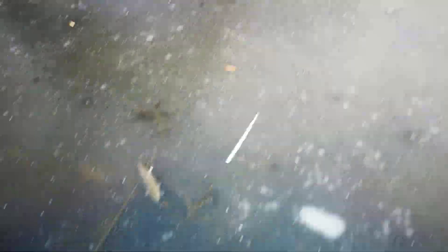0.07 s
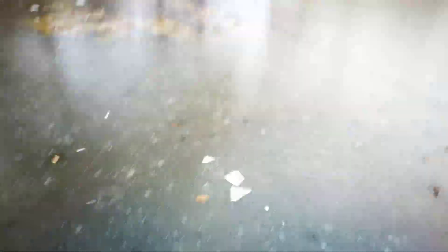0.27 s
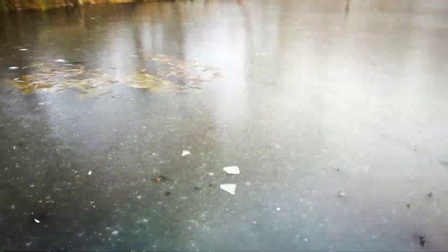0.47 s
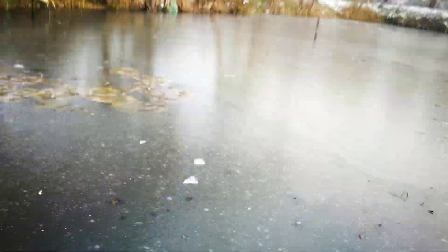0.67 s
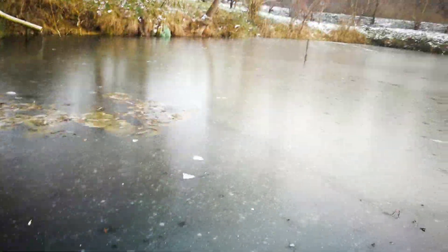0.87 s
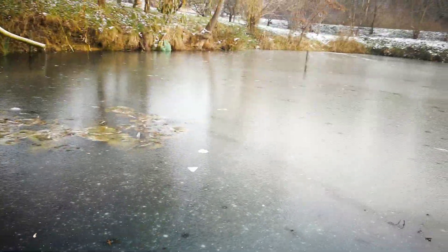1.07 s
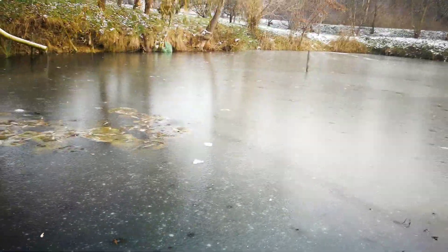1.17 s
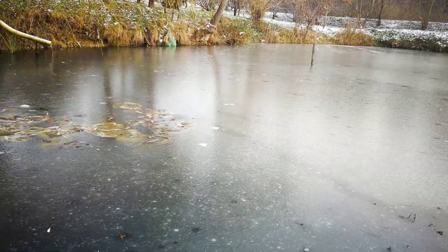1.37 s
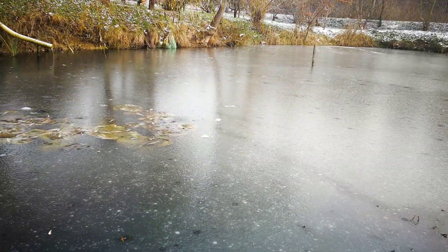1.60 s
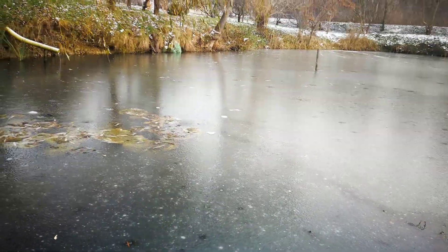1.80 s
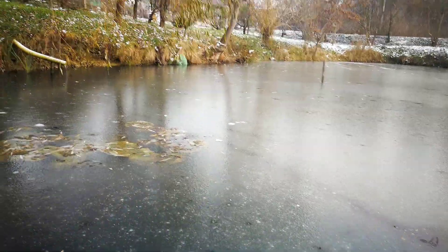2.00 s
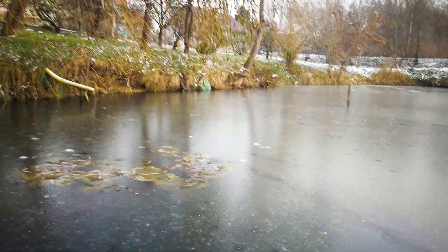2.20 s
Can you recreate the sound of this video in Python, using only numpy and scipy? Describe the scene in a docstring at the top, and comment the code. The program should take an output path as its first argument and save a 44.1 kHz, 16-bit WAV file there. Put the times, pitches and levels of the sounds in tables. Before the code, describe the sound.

Thin ice shatters on a frozen pond after a soft sleeve swish close to the microphone. Its pieces bounce with faint chirps, then rattle and hiss into the distance under low gusts of wind.

```python
"""A frozen pond: a thin plate of ice is tossed onto it, breaks, bounces and skitters away in shards.
Each blow slaps the ice sheet, rings the shard and sends a short falling chirp through the sheet.
The sliding shards scrape and rattle over tiny bumps, fading with distance; one bump gives a soft knock.
Wind buffets the microphone throughout."""
import sys
import numpy as np
from scipy import signal
from scipy.fft import rfft, irfft
from scipy.io import wavfile
from scipy.ndimage import map_coordinates

SR = 44100
rng = np.random.default_rng(int(sys.argv[2]) if len(sys.argv) > 2 else 0)


def to_wav(s):
    """Save 16-bit WAV."""
    ch = np.atleast_2d(s).T  # columns
    pcm = np.round(np.clip(ch, -1, 1) * 32767)  # PCM
    wavfile.write(sys.argv[1], SR, pcm.astype(np.int16))


N = 99225
T = np.arange(N) / SR

# Sliding friction: (time [s], low scrape [dB], treble hiss [dB])
SLIDE_LEVELS = [(.27, -55, -57), (.32, -43.5, -48), (.345, -45.5, -53), (.39, -48.5, -42), (.55, -42, -43),
                (.62, -40.5, -46.5), (.77, -40, -45), (.85, -43, -49.5), (1.035, -44.5, -51.5),
                (1.058, -52.5, -64), (1.11, -48.5, -52), (1.19, -48, -64.5), (1.26, -51.5, -49),
                (1.355, -53, -72), (1.45, -51, -55.5), (1.585, -54, -59), (2.25, -56, -62.5)]
# Main resonance of the shards: (time [s], pitch [Hz], level [dB])
SHARD_RESONANCE = [(.3, 3600, -78.5), (.37, 3680, -40), (.44, 3700, -51.5), (.77, 3700, -45),
                   (1.03, 4038, -47.5), (1.23, 3850, -48), (2.25, 3800, -54)]
# Treble of small ice contacts: (frequency [Hz], gain [dB])
HISS_SPECTRUM = [(2000, -9.5), (5000, -9.5), (6200, -2), (9100, 1), (10200, -4.5), (11300, -0.5),
                 (13000, -10), (15000, -8.5)]

SLAP_RISE_S, RING_RISE_S, PING_RISE_S = 0.00036, 0.0011, 0.00076
RING_PAN_DB, LOW_PAN_DB, HIGH_PAN_DB = 2.5, 5, 9
ROCKING_HZ, FORCE_SCATTER_DB = 134.96, 4.5


def undb(db):
    return 10 ** (np.asarray(db) / 20)


def unit_rms(x):
    return x / np.sqrt(np.mean(x ** 2))


def curve(table, column, t):
    """Table column interpolated at times t."""
    return np.interp(t, np.array(table)[:, 0], np.array(table)[:, column])


def colour(x, spectrum):
    """Minimum-phase filter through (Hz, dB) points, scaled to unit power gain."""
    size = 2 ** 17
    hz, db = np.array(spectrum).T
    bins_hz = np.arange(size // 2 + 1) * SR / size + 1
    gain = unit_rms(undb(np.interp(np.log(bins_hz), np.log(hz), db)))
    cepstrum = irfft(np.log(gain))
    cepstrum[1:size // 2] *= 2
    cepstrum[size // 2 + 1:] = 0
    return irfft(rfft(x, size) * np.exp(rfft(cepstrum)), size)[..., :N]


def wander(rate_hz):
    """Random drift, rms 1; holds after 2000 steps."""
    return unit_rms(np.interp(T * rate_hz, np.arange(2000), rng.standard_normal(2000)))


def burst(rise_s, hz=None):
    """Heavily damped ring; a noise crunch if no pitch is given."""
    t = T[:700]
    shape = (t / rise_s * np.exp(1 - t / rise_s)) ** 2
    if hz is not None:
        return shape * np.sin(2 * np.pi * hz * t)
    crunch = shape * rng.standard_normal(len(t))
    return crunch * np.linalg.norm(shape) / np.linalg.norm(crunch)


def add(track, at_s, sound):
    i = int(at_s * SR)
    track[..., i:i + sound.shape[-1]] += sound[..., :max(N - i, 0)]


def pan(left_lead_db):
    gains = undb(np.array([[left_lead_db], [-left_lead_db]]) / 2)
    return gains / gains.mean()


def stereo(make, width):
    """Two ears of a random sound; width is the unshared power fraction."""
    return np.sqrt(1 - width) * make() + np.sqrt(width) * np.array([make(), make()])


def wind():
    """Puffs rumble on the microphone, brighter when strong, over still air; one low thump."""
    # Wind puffs: (time [s], half width [s], level [dB])
    puffs = [(0.076, 0.021, -44.5), (0.26, 0.043, -42), (0.727, 0.029, -47.5), (1.18, 0.055, -44),
             (1.309, 0.034, -36.5), (1.364, 0.0092, -37), (1.54, 0.031, -47), (1.695, 0.033, -37),
             (1.792, 0.015, -38), (1.955, 0.08, -38), (2.12, 0.0089, -39.5), (2.25, 0.027, -35)]
    # Wind and air spectra: (frequency [Hz], gain [dB])
    rumble_spectrum = [(20, -5), (45, 3), (80, 2), (140, -2.5), (200, -12), (300, -18.5), (450, -34),
                       (900, -66.5)]
    air_spectrum = [(30, 1), (150, 12), (400, 8.5), (1000, -1), (2500, -13), (4500, -5.5), (8500, -10),
                    (11000, -5.5), (15000, -25)]
    buffet_spectrum = [(50, -23), (130, 4.5), (260, -6), (380, -17.5), (600, -35.5), (2000, -58)]
    breeze = undb(-57 + 9.5 * np.clip((T - 1.068) / 0.05, 0, 1))
    puff_power = sum(undb(db) ** 2 * np.exp(-((T - at_s) / half_s) ** 2) for at_s, half_s, db in puffs)
    gust = np.sqrt(breeze ** 2 + puff_power)
    mid, side, flutter, flutter_side = rng.standard_normal((4, N))
    ears = np.array([[1], [-1]])
    rumble = colour(mid + undb(-13.5) * ears * side, rumble_spectrum) * gust
    buffet = colour(flutter + 0.94 * ears * flutter_side, buffet_spectrum) * gust ** 2 / gust.max()
    air = colour(stereo(lambda: rng.standard_normal(N), 0.9), air_spectrum)
    thump_s, thump_hz = 0.178, 59.6
    cycles = (T - thump_s) * thump_hz
    thump = -np.exp(-2 * cycles ** 2) * np.sin(2 * np.pi * cycles)
    return undb(-0.5) * rumble + undb(-1.5) * buffet + undb(-62.5) * air + undb(-31) * thump


def toss():
    """Sleeve swish and a soft flick as the plate is let go."""
    # Sleeve: (frequency [Hz], gain [dB])
    spectrum = [(200, -17.5), (700, 5), (2300, 1.5), (4500, -6.5), (10500, -4), (15000, -13)]
    swish = rng.standard_normal((2, N)) * np.exp(-0.5 * ((T - 0.048) / 0.026) ** 2)
    out = undb(-43.5) * colour(swish, spectrum)
    add(out, 0.0452, undb(-31.5) * burst(rise_s=0.00085, hz=790))
    return out


def landing():
    """The plate hits, breaks and bounces; splinters fly off after each blow."""
    # Impacts: (time [s], slap [dB], slap [Hz], ring [dB], ring [Hz], ping [dB], ping [Hz], crack [dB])
    blows = [(0.2123, -3.5, 1590, -13, 3330, -16.5, 7800, -11),
             (0.22, -4, 1240, -23, 2760, -14.5, 7730, -11.5),
             (0.2621, -10.5, 2050, -25, 3320, -18.5, 8220, -21.5),
             (0.2842, -31, 2130, -20.5, 3670, -5.5, 6924, -9),
             (0.3075, -24, 1940, -25, 3530, -17.5, 7970, -15),
             (0.354, -49, 2060, -24, 3680, -12.5, 9160, -16.5),
             (0.3629, -26, 1840, -14.5, 3400, -14, 8780, -11)]
    # Breaking ice: (frequency [Hz], gain [dB])
    crack_spectrum = [(400, -26), (1200, -12.5), (3000, -6), (4700, -6), (5800, -0.5), (9000, 1.5),
                      (11000, -1), (12500, -5.5), (15500, -8)]
    tones, cracks = np.zeros((2, 2, N))
    for at_s, slap_db, slap_hz, ring_db, ring_hz, ping_db, ping_hz, crack_db in blows:
        slap = undb(slap_db) * burst(SLAP_RISE_S, slap_hz)
        ring = undb(ring_db) * burst(RING_RISE_S, ring_hz)
        ping = undb(ping_db) * burst(PING_RISE_S, ping_hz)
        crack = undb(crack_db) * stereo(lambda: burst(rise_s=0.00056), 0.48)
        add(tones, at_s, pan(LOW_PAN_DB) * (slap + ring) + pan(HIGH_PAN_DB) * ping)
        add(cracks, at_s, pan(HIGH_PAN_DB) * crack)
        for delay_s in rng.exponential(0.0076, size=6):
            splinter = undb(crack_db - 17) * stereo(lambda: burst(rise_s=0.00028), 0.36)
            add(cracks, at_s + delay_s, pan(LOW_PAN_DB) * splinter)
    return tones + colour(cracks, crack_spectrum)


def sheet_chirp(x):
    """Bending waves in the pond ice: lows travel slower, so a blow becomes a falling chirp."""
    centre_hz, width_oct = 1007.3, 0.74
    ice_travel_s, air_travel_s = 0.017, 0.008  # at centre_hz
    lag_s_per_s = 0.002045  # later arrival as the shards slide away
    hz = np.arange(N + 1) * SR / (2 * N) + 1
    phase = 2 * np.pi * (2 * ice_travel_s * np.sqrt(hz * centre_hz) - air_travel_s * hz)
    gain = undb(-12.5) * np.exp(-0.5 * (np.log2(hz / centre_hz) / width_oct) ** 2)
    waves = irfft(rfft(x, 2 * N) * gain * np.exp(-1j * phase))[..., :N]
    return np.array([map_coordinates(ear, [np.arange(N) * (1 - lag_s_per_s)]) for ear in waves])


def reverb(x, t60_s):
    """Diffuse decay, different in each ear."""
    t = T[:SR // 2]
    response = rng.standard_normal((2, len(t))) * np.exp(-np.log(1000) * t / t60_s)
    return signal.fftconvolve(x, response / np.linalg.norm(response[0]), axes=1)[:, :N]


def scrape():
    """Dense tiny contacts with the frosted surface, pulsing as the shards rock."""
    # Low friction noise: (frequency [Hz], gain [dB])
    scrape_spectrum = [(250, -13), (520, -9.5), (800, -4.5), (1200, 1.5), (1700, 0), (2700, -2),
                       (4300, -2.5), (6000, -6), (12000, -14.5)]
    grains_per_s, scatter_db = 3500, 6.5

    def grains():
        contacts = (rng.random(N) < grains_per_s / SR) * np.sign(rng.standard_normal(N))
        return unit_rms(contacts * undb(scatter_db * np.minimum(rng.standard_normal(N), 2)))

    rocking = unit_rms(undb(3.5 * wander(ROCKING_HZ)))
    low = stereo(grains, 0.7) * rocking * undb(curve(SLIDE_LEVELS, 1, T) + 2.5)
    hiss = stereo(grains, 1) * rocking * undb(curve(SLIDE_LEVELS, 2, T))
    return pan(LOW_PAN_DB) * colour(low, scrape_spectrum) + pan(HIGH_PAN_DB) * colour(hiss, HISS_SPECTRUM)


def rubbed_ring():
    """Rubbing keeps the shards' main resonance ringing, rough and unsteady in pitch."""
    width_hz = 550
    pitch_hz = curve(SHARD_RESONANCE, 1, T) * (1 + 0.05 * wander(ROCKING_HZ))
    phase = 2 * np.pi * np.cumsum(pitch_hz) / SR
    ring = stereo(lambda: wander(width_hz) * np.sin(phase) + wander(width_hz) * np.cos(phase), 0.71)
    force = unit_rms(undb(FORCE_SCATTER_DB * wander(ROCKING_HZ)))
    return pan(RING_PAN_DB) * ring * force * undb(curve(SHARD_RESONANCE, 2, T) - 4)


def rattle():
    """Shards skip over bumps: strong skips and a random patter of small ones."""
    # Strong skips: (time [s], ring [dB], crack [dB])
    skips = [(.32, -26, -22.5), (0.3911, -28, -31), (0.4, -30, -26.5), (0.4111, -38, -26),
             (0.4312, -49, -22.5), (.4562, -41, -33), (.4695, -25.5, -45), (.5066, -37, -46),
             (0.6024, -28, -26.5), (0.612, -33, -30), (0.622, -23.5, -26), (0.6628, -42, -39),
             (.6852, -31, -36), (0.709, -26.5, -32), (0.7371, -39, -26.5), (0.756, -23, -29),
             (0.7643, -26, -27.5), (0.8134, -27, -36.5), (0.859, -30.5, -39), (0.9176, -24.5, -34),
             (0.9547, -34, -43), (1.027, -25, -39), (1.072, -55, -36), (1.091, -41, -38), (1.122, -28, -35),
             (1.173, -27, -51), (1.2082, -28.5, -50), (1.2318, -17, -38), (1.2585, -33, -35.5),
             (1.293, -32, -37.5), (1.3314, -32, -55.5), (1.345, -38, -64), (1.391, -30, -27),
             (1.421, -35.5, -36.5), (1.4445, -24.5, -43), (1.459, -40, -37), (1.602, -50, -38),
             (1.6138, -26.5, -35.5), (1.649, -32.5, -57), (1.693, -30, -38), (1.920, -31, -47),
             (2.016, -36, -65)]
    jitter, force, grit, pitch = rng.standard_normal((320, 4)).T
    times_s = np.linspace(0.34, N / SR, 320) + 0.008 * jitter
    force_db, grit_db = FORCE_SCATTER_DB * np.minimum([force, grit], 2)
    rings_db = curve(SHARD_RESONANCE, 2, times_s) + 7 + force_db
    cracks_db = curve(SLIDE_LEVELS, 2, times_s) + 7 + force_db + grit_db / 2
    patter = list(zip(times_s, rings_db, cracks_db, 1 + 0.06 * pitch))
    rings, tones, cracks = np.zeros((3, 2, N))
    for at_s, ring_db, crack_db, detune in [(*skip, 1) for skip in skips] + patter:
        scatter = rng.uniform(-1.08, 1, 4)
        slap_ratio, ping_ratio, crack_ratio = np.exp(0.5 * scatter[1:])
        ring = undb(ring_db) * burst(RING_RISE_S, detune * curve(SHARD_RESONANCE, 1, at_s))
        slap = undb(min(ring_db - 6.5, -34)) * burst(SLAP_RISE_S, hz=1830 * slap_ratio)
        ping = undb(crack_db + 1.5) * burst(PING_RISE_S / 2, hz=8460 * ping_ratio)
        crack = undb(crack_db) * stereo(lambda: burst(rise_s=0.00083 * crack_ratio), 1)
        add(rings, at_s, pan(RING_PAN_DB + 4 * scatter[0]) * ring)
        add(tones, at_s, pan(LOW_PAN_DB) * slap + pan(HIGH_PAN_DB) * ping)
        add(cracks, at_s, pan(HIGH_PAN_DB) * crack)
    roughness = 1 + 0.4 * np.array([wander(1500), wander(1500)])
    return rings * roughness + tones + colour(cracks, HISS_SPECTRUM)


def knock():
    """One heavier bump: a soft, rough knock, falling in pitch."""
    at_s, start_hz, octave_fall_s, decay_s = 0.613, 1033.7, 0.00747, 0.007
    phase = 2 * np.pi * start_hz * octave_fall_s * np.log(1 + T / octave_fall_s)
    out = np.zeros(N)
    add(out, at_s, undb(-32) * np.exp(-T / decay_s) * np.sin(phase + 1.6 * wander(900)))
    return out


def scene():
    low_cut = signal.butter(2, 890, "high", fs=SR, output="sos")
    ice = signal.sosfilt(low_cut, landing() + rattle()) + scrape() + rubbed_ring()
    near_tail = undb(-13) * reverb(ice, t60_s=0.03)
    bank_tail = undb(-27) * reverb(ice, t60_s=0.4)
    ice = ice + sheet_chirp(ice) + near_tail + bank_tail
    right_lag_s = 55e-6 * np.minimum(T / 0.48, 1)  # the shards drift left
    ice[1] = map_coordinates(ice[1], [np.arange(N) - right_lag_s * SR])
    return ice + knock() + toss() + wind()


def record(dry):
    """Clip at full scale, then cut the top."""
    high_cut = signal.ellip(8, 0.2, 60, 15700, fs=SR, output="sos")
    return signal.sosfilt(high_cut, np.clip(dry, -1, 1))


dry = scene()
out = record(dry)
to_wav(out)
```